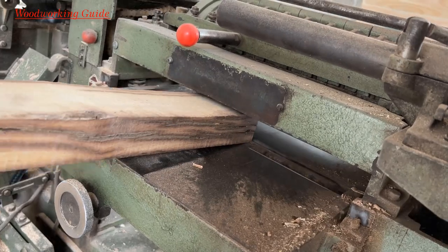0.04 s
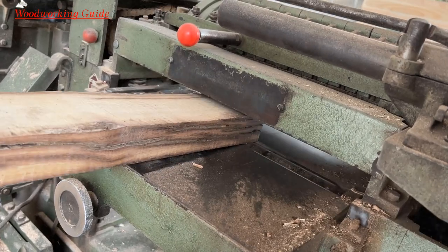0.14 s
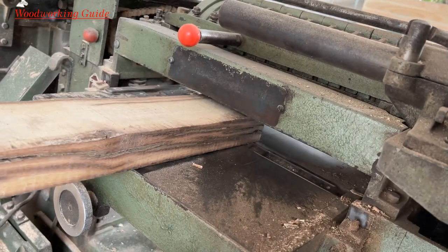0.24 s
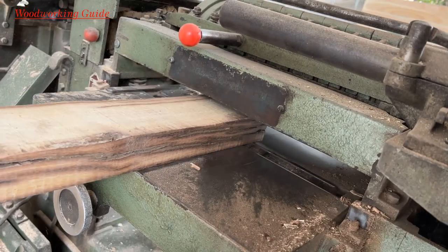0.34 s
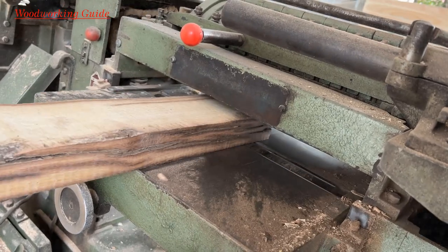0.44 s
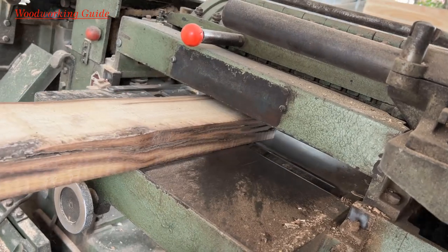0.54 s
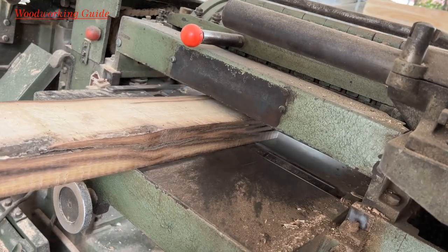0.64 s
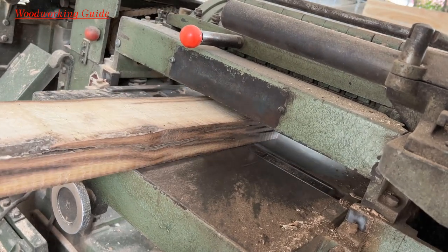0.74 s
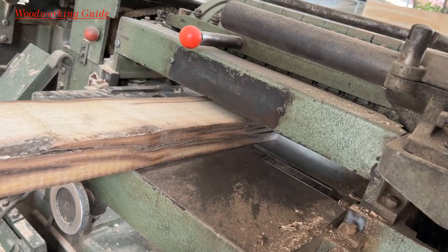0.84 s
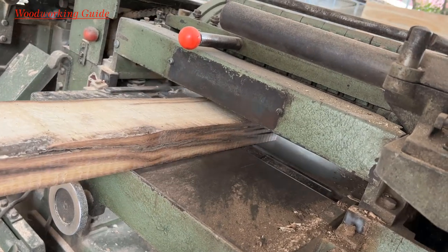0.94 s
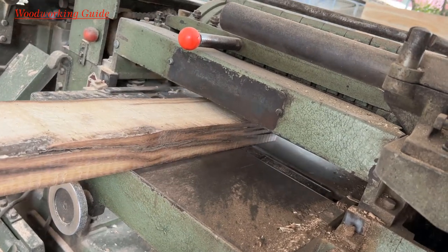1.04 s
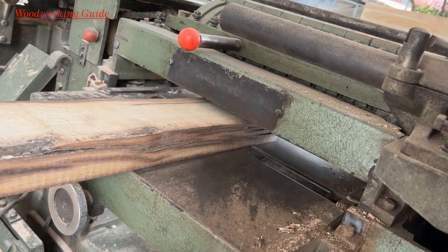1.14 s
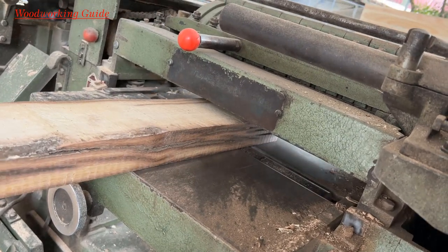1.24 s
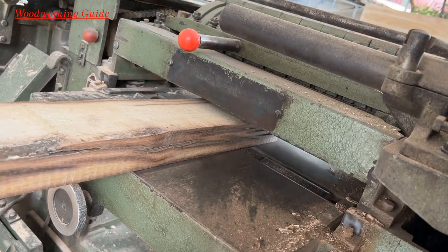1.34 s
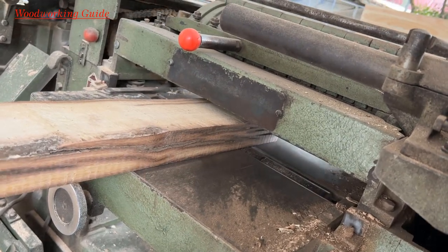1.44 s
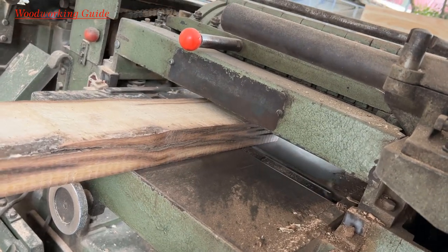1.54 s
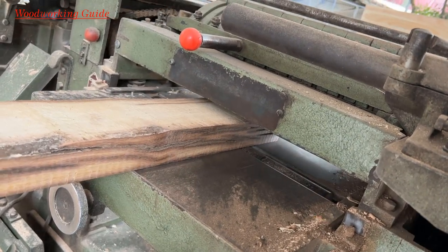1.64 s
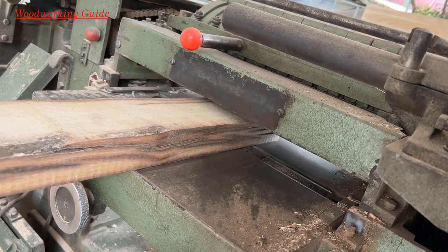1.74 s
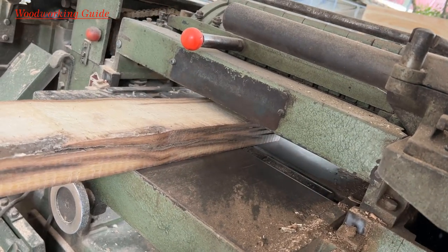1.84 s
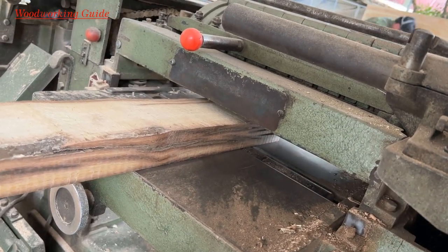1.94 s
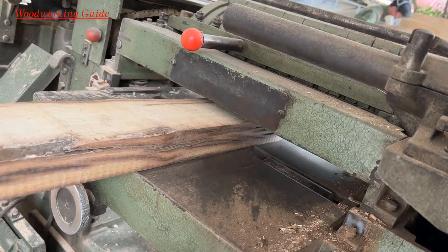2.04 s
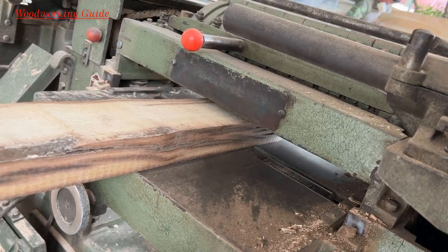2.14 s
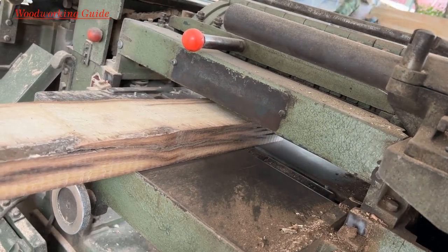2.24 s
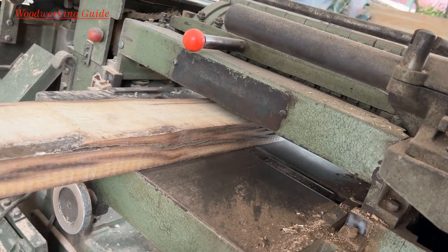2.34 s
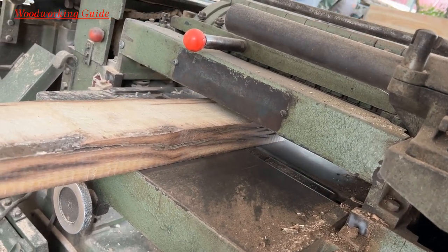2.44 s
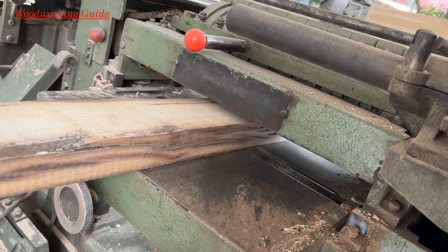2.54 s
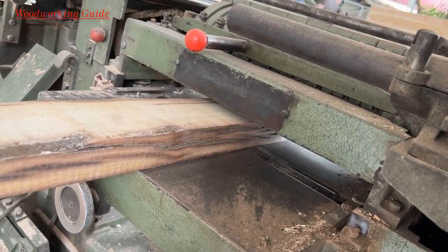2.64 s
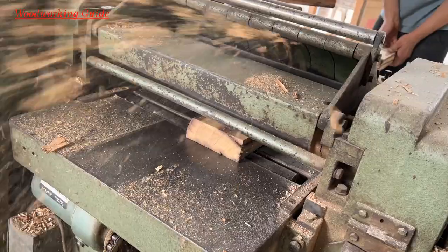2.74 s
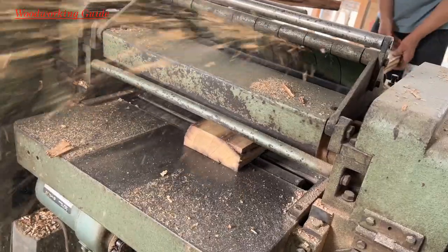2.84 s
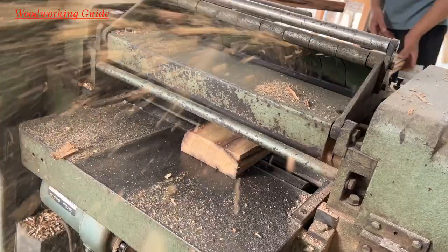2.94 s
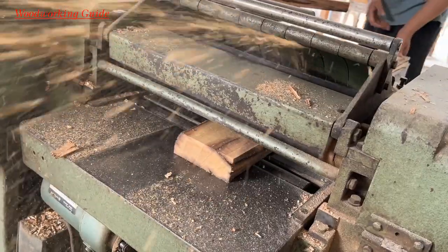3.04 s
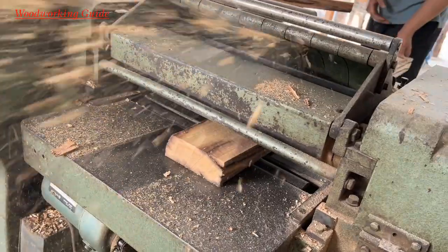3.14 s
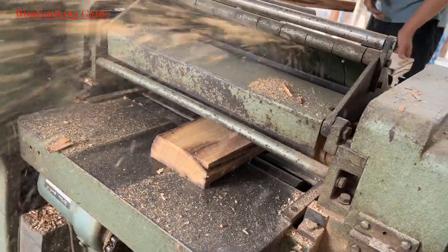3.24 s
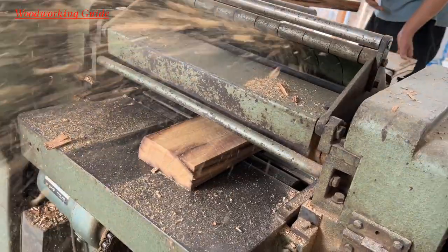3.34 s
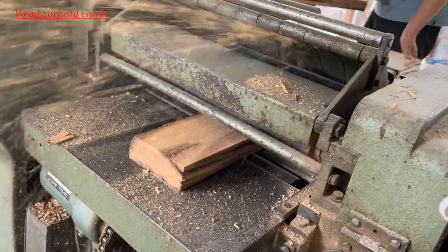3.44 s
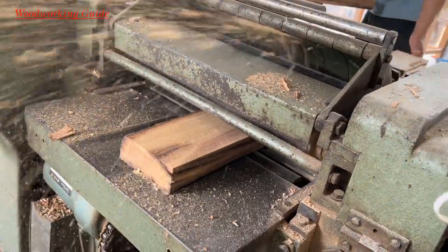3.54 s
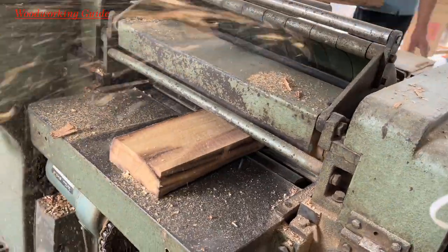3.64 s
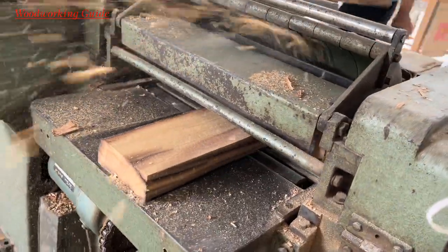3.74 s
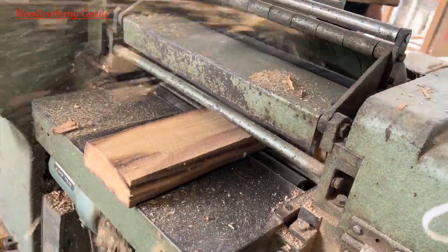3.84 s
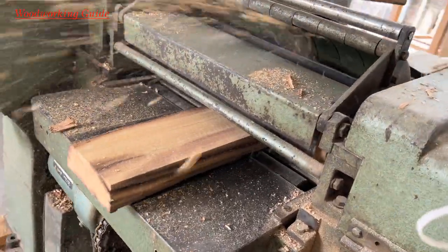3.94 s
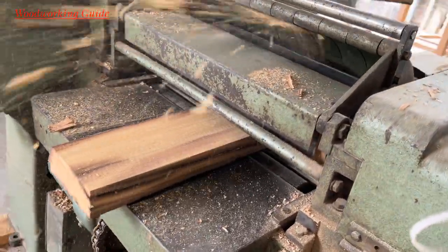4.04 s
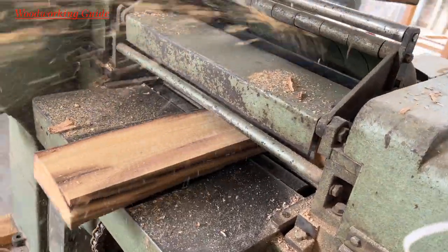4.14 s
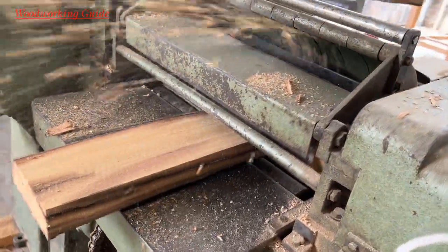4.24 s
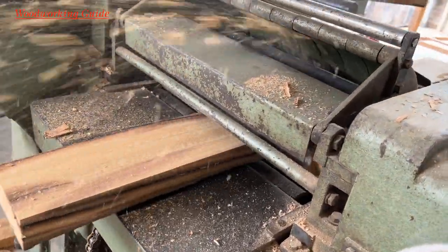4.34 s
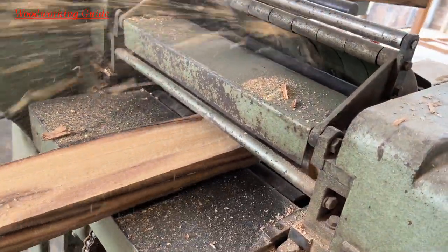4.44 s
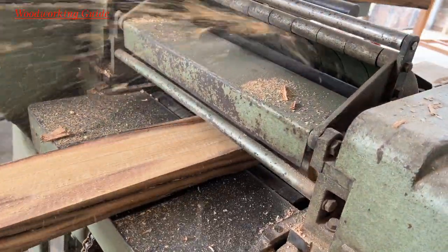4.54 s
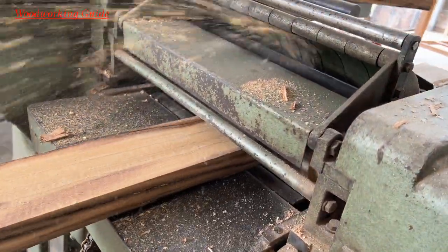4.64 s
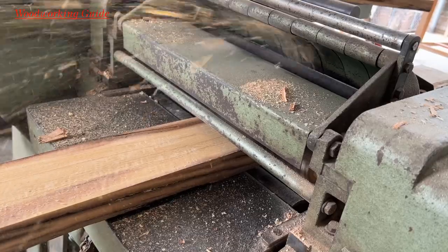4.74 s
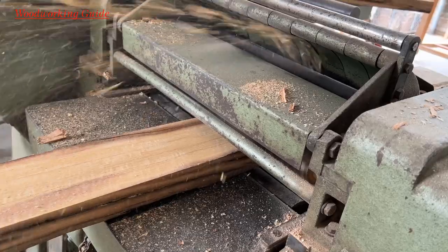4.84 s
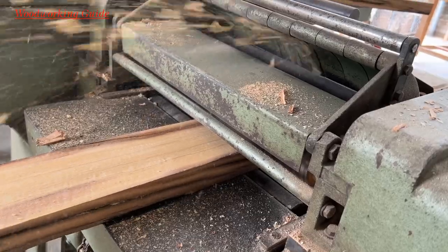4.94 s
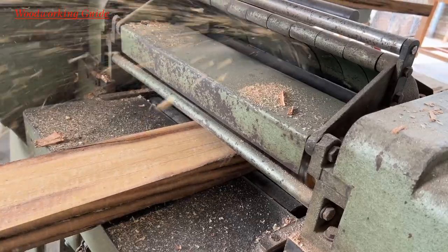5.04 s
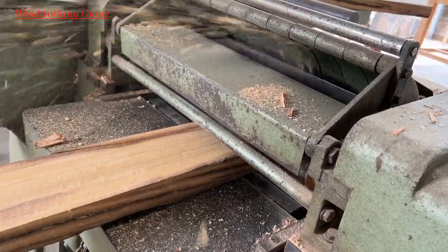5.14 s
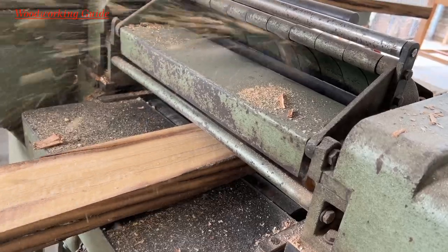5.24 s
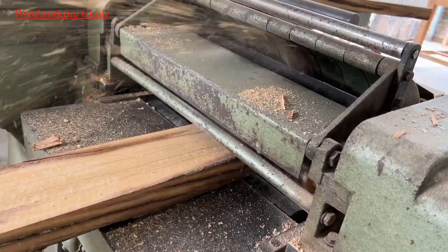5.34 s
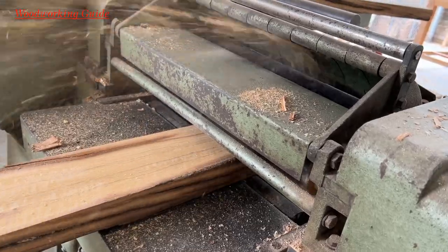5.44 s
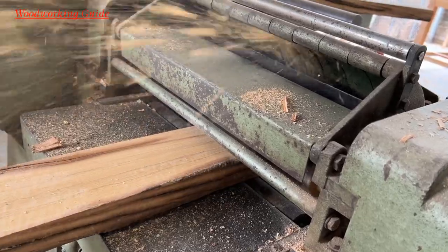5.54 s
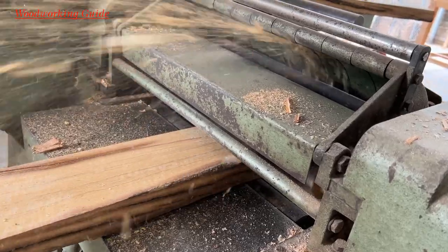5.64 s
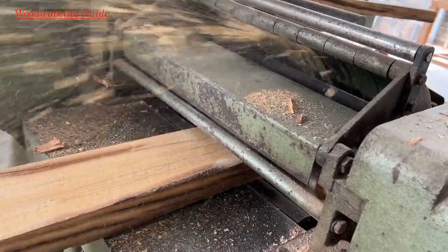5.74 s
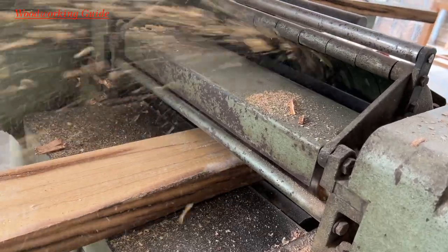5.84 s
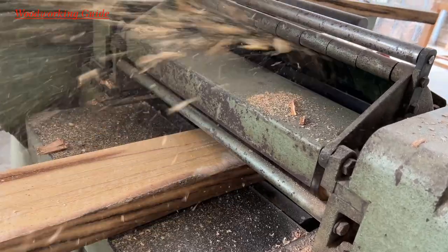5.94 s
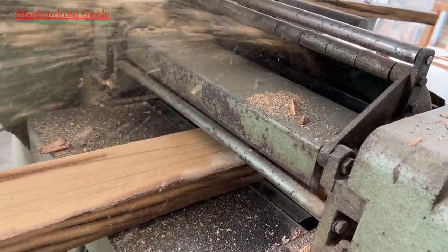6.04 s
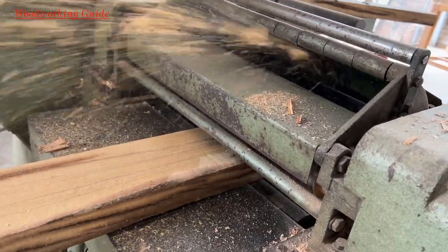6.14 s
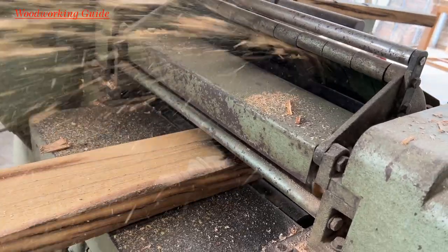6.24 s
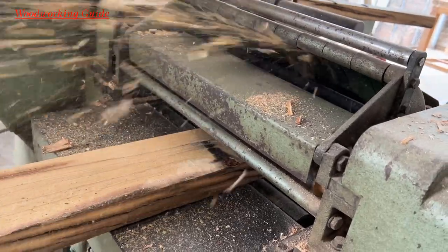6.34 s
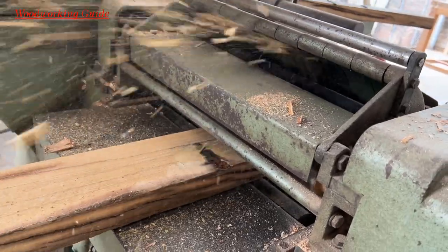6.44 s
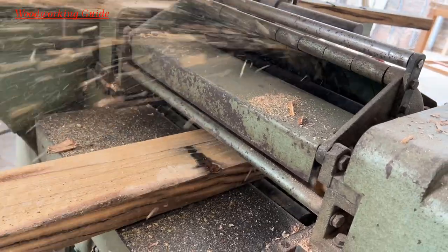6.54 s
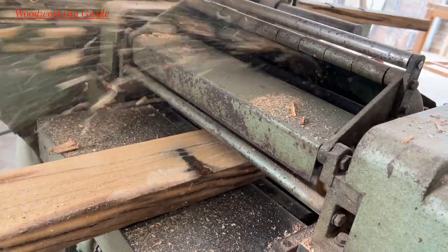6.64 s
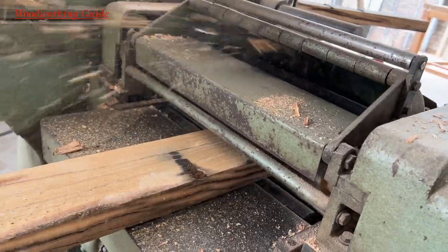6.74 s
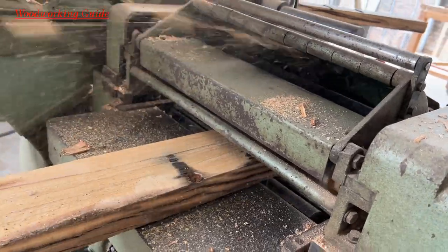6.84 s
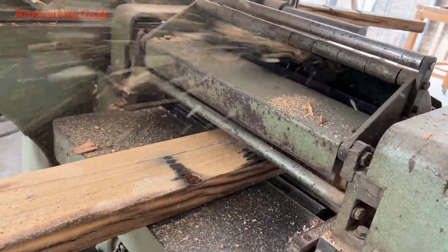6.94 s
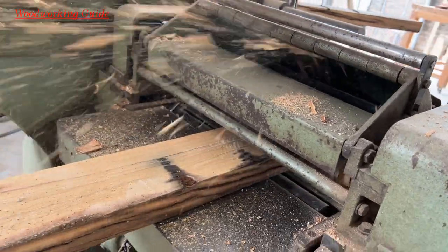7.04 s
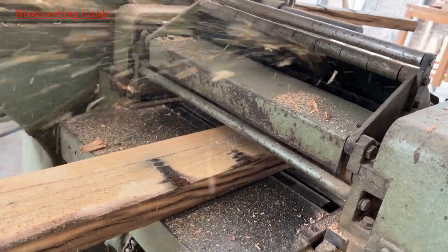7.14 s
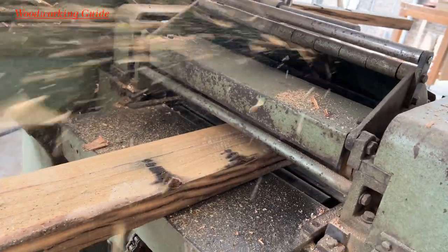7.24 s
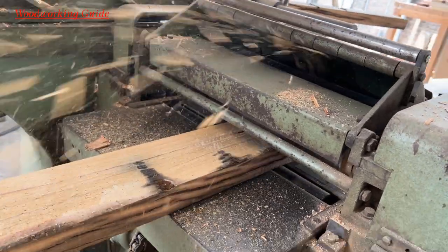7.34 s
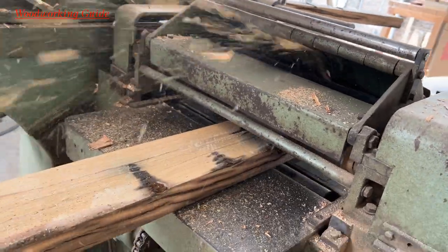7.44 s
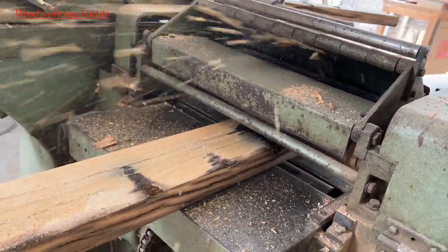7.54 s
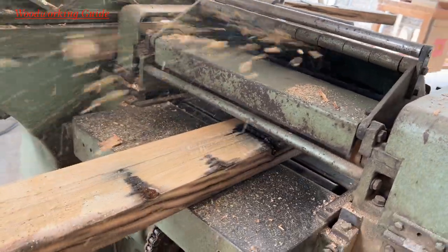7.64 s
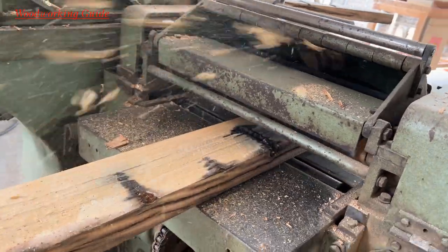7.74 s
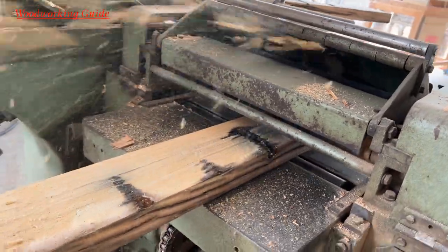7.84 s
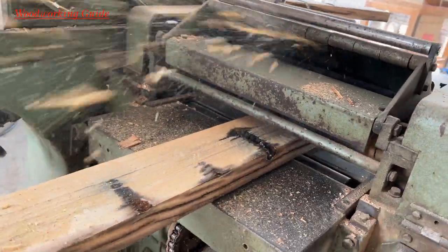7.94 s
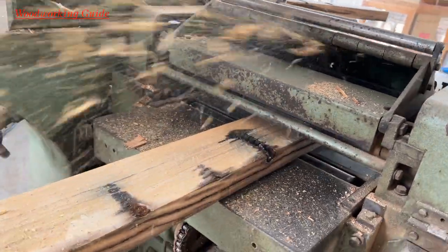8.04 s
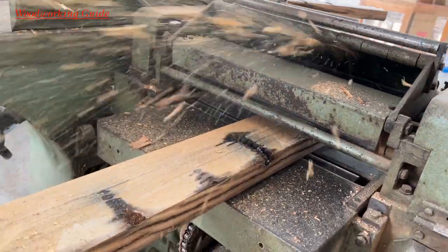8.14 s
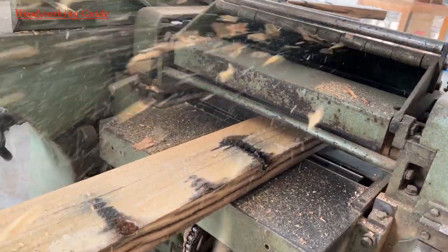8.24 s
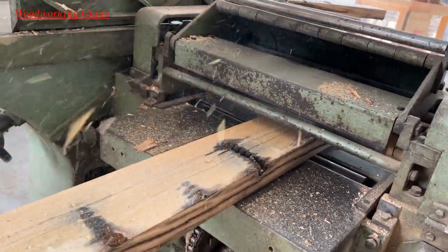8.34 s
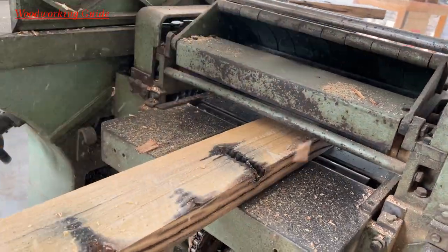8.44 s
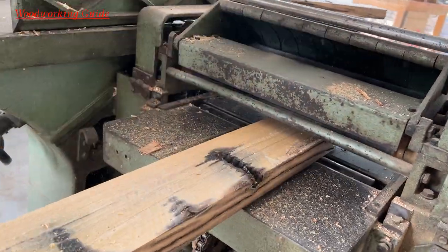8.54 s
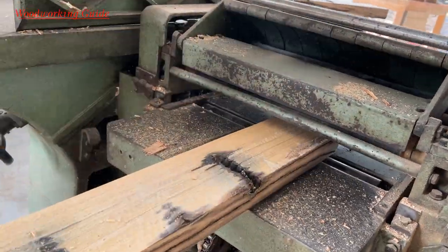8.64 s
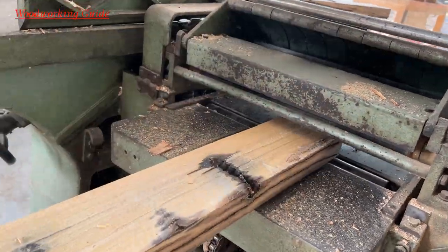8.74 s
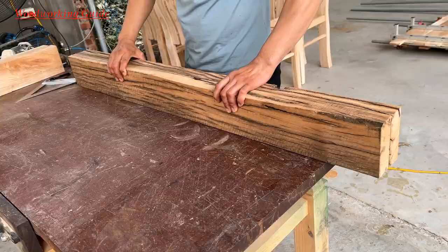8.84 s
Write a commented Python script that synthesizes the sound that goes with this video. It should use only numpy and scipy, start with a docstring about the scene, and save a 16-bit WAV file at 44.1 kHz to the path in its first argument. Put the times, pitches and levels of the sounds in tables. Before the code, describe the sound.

A workshop planer spins with a steady siren-like howl and rushing air. After a few short knocks and scrapes, the knives graze a rough plank and bite in. The sound jumps to the outfeed side: a harsh, ringing buzz with squeals, splintering cracks and hissing chips, a few thumping the close microphone. Near the end the cutting stops and the cutter spins on more quietly.

```python
"""A steady howl comes first: the three spinning knives of a workshop planer chop the air like a siren.
After a few short knocks and scrapes, the knives graze a rough plank and bite in. We then jump from where
the wood goes in to where it comes out. The knife that sticks out most bites once a turn, making the
plank and the steel hood ring and squeal. Wood splinters, chips spray out and a few hit the microphone.
When the plank has passed, the cutter spins on with nothing to cut."""
import sys
import numpy as np
from scipy import signal
from scipy.fft import rfft, irfft
from scipy.io import wavfile
from scipy.ndimage import uniform_filter1d, map_coordinates

SR = 44100
rng = np.random.default_rng(int(sys.argv[2]) if len(sys.argv) > 2 else 0)


def persist_wave(psi):
    """Save psi, clipped to +-1, as 16-bit WAV."""
    counts = np.round(np.clip(psi, -1, 1) * 32767).astype(np.int16)
    wavfile.write(sys.argv[1], SR, np.atleast_2d(counts).T)


N = 391608
T = np.arange(N) / SR
HZ = np.fft.rfftfreq(N, 1 / SR)
ENTRY_S, EXIT_S = 2.095, 8.335  # the knives bite into the plank; its tail leaves them
MOVE_S, MOVE_FADE_S = 2.738, 0.017  # we jump from the infeed (wood in) to the outfeed (wood out)


# Overtones of the howl: multiple of the turn rate, relative infeed level/dB, relative outfeed level/dB
HOWL_OVERTONES = [(6, -1, 1), (9, -6, -9), (12, -2, -6), (15, -9, -14.5), (21, -15, -16.5),
                  (24, -12.5, -14.5)]

def howl(turns):
    """Three knives passing the table's edge chop the air like a siren."""
    # the plank shades the slot as it nears, then muffles it
    tone_db = crossfade(-30 - 1.5 * T - 5.5 * covered(), -44)
    overtones_db = crossfade(-34.5 - 2.5 * T - 5.5 * covered(), -45.5)
    pumping = loaded(1.95, 0.38) ** (moved() * in_cut())  # a heavier cut lifts the overtones
    overtones = sum(amp(crossfade(in_db, out_db)) * tone(k * turns, 0.052, 0.77)
                    for k, in_db, out_db in HOWL_OVERTONES)
    overtones = out_of_step(pumping * overtones, 0.22) * pan(0.55)
    chop = out_of_step(tone(3 * turns, 0.012, 0.077), 0.25 * (1 - moved()))
    return amp(tone_db) * chop * crossfade(pan(3.8), pan(0.16)) + amp(overtones_db) * overtones


# Notes at which the machine's table rings: f/Hz, width/Hz, relative level/dB
TABLE_RINGS = [(1500, 530, -6), (2077, 660, 4.5)]
# The plank's main ring, shifting with the grain: t/s, relative level/dB, f/Hz
PLANK_RING = [(2.78, -37, 2286), (3.3, -31.5, 2335), (3.58, -33.5, 2320), (3.75, -29, 2260),
              (4.0, -30, 2257), (4.33, -36, 2200), (4.65, -30, 2280), (4.8, -32, 2290), (4.97, -29, 2340),
              (5.37, -38, 2290), (5.52, -33, 2174), (5.88, -30, 2290), (6.05, -31, 2280), (6.43, -31, 2340),
              (6.85, -33, 2220), (6.96, -32, 2380), (7.26, -32.5, 2382), (7.39, -27.5, 2280),
              (7.66, -27, 2380), (7.75, -36, 2330), (8.0, -24.5, 2370), (8.1, -21.5, 2360),
              (8.15, -37, 2200), (8.28, -27, 2180)]

def plank(turns):
    """Each bite rings the plank, the table under it and the steel hood over it."""
    ring_db, ring_hz = curve(PLANK_RING)
    bite = bites(turns)
    chatter = (repeating(bite, 20) + 0.6 * noise()) * bursts(bite, 0.25, -9, 1.2)
    knocks = housing(blows(bite, spread_db=1.5), 0.95, -0.5)
    shaking = no_bass(knocks + 0.62 * chatter, 420)
    table = sum(amp(db) * resonate(shaking, hz, width) for hz, width, db in TABLE_RINGS)
    wood = amp(ring_db - 3) * resonate(shaking, ring_hz, 374)
    hood = resonate(shaking, 3450, 910) + amp(-3) * resonate(shaking, 3337, 130)
    return loaded(-44, 1.25) * table * pan(1.9) + wood * pan(2.9) + loaded(-40, 0.49) * hood * pan(0.4)


# How much of the main ring lingers: t/s, level/dB added to that of PLANK_RING
LINGERING = [(2.8, -1.5), (3.3, 0), (3.8, -4.5), (4.95, -9), (7.3, -9.5), (7.6, -4.5), (8.05, -6),
             (8.15, -7)]
# The plank's lower ring: t/s, level/dB
LOW_RING = [(2.8, -35.5), (3.3, -40.5), (4.2, -43), (4.8, -41), (5.0, -42.5), (5.3, -44.5), (5.55, -37),
            (6.3, -45), (7.1, -48), (7.33, -37), (7.5, -49), (8.2, -38)]

def scream(turns):
    """Two sharp notes of the plank ring on from bite to bite; the upper one follows the grain."""
    knocks = blows(bites(turns), spread_db=2.5)
    ring_db, ring_hz = curve(PLANK_RING)
    high = amp(ring_db + curve(LINGERING)[0]) * resonate(knocks, ring_hz, width_hz=176)
    low = amp(curve(LOW_RING)[0]) * resonate(knocks, hz=1760, width_hz=72)
    return (high + low) * pan(0.94)


# Hard spots in the grain: middle t/s, half length/s, f/Hz, slide/(Hz per s), width/Hz, level/dB
HARD_SPOTS = [(2.15, 0.044, 3270, 0, 600, -38), (2.22, 0.076, 6400, 0, 900, -34),
              (2.33, 0.031, 3680, 0, 900, -36), (2.393, 0.025, 1560, 0, 900, -37),
              (2.497, .11, 6160, -15, 600, -35), (2.665, 0.062, 6700, 0, 500, -29.5),
              (2.7, .025, 1940, 0, 800, -36), (3.296, 0.38, 3290, 100, 400, -41),
              (3.835, 0.17, 3330, -3, 400, -38.5), (3.895, 0.29, 2100, 0, 400, -35.5),
              (4.03, 0.24, 2680, 0, 300, -35), (4.55, 0.11, 2050, 0, 380, -36),
              (4.66, .2, 3500, 400, 300, -54), (5.243, .08, 2560, 0, 394, -32.5),
              (5.595, 0.14, 3490, 0, 260, -36.5), (6.033, 0.034, 3530, 0, 400, -38),
              (6.334, 0.12, 2780, 1000, 594, -30), (6.457, 0.078, 3300, 1500, 450, -34),
              (6.75, .16, 4540, 0, 600, -43), (7.01, .07, 4670, 0, 600, -37),
              (7.09, 0.19, 3380, 502, 280, -38.5), (7.2, 0.052, 3060, 0, 600, -32.5),
              (7.31, 0.14, 4900, 0, 350, -42), (7.372, 0.053, 2150, 0, 400, -37),
              (7.48, 0.3, 2860, 0, 330, -37.5), (7.68, 0.14, 3900, -2, 330, -38),
              (7.736, 0.02, 3500, 0, 480, -27), (7.92, 0.12, 1750, 1.5, 566, -35.5),
              (8.034, 0.069, 2760, 1500, 480, -27.5), (8.116, 0.011, 1850, 0, 900, -28),
              (8.21, 0.078, 1320, 0, 350, -35.5), (8.22, 0.091, 3470, -7.5, 326, -28),
              (8.21, 0.12, 3720, 0, 328, -33), (8.2, 0.12, 1720, -3, 500, -28),
              (8.252, 0.052, 2130, 0, 450, -38)]

def squeals(turns):
    """At a hard spot every bite rings the wood at one more pitch, which may slide with the grain."""
    bite = bites(turns)
    chatter = evened((repeating(bite, 30) + 0.19 * noise()) * bursts(bite, 0.26, -19, 2.5))
    shaking = blows(bite, spread_db=2.5) + 0.42 * chatter
    out = np.zeros((2, N))
    for s, half, hz, slide, width, db in HARD_SPOTS:
        spot = abs(T - s) < 1.6 * half + 0.01
        since = T[spot] - s
        swell = amp(db) * np.exp(-(since / half) ** 4)
        out[:, spot] += swell * resonate(shaking[:, spot], hz + slide * since, width)
    return out * crossfade(pan(4.2), pan(1.1))


# Strength of the tearing: t/s, relative level/dB
TEAR_LEVEL = [(2.8, -34.5), (2.89, -36.5), (4.33, -36.5), (4.34, -39.5), (4.58, -37.5), (5.0, -39),
              (5.15, -38.5), (5.17, -42.5), (5.47, -35), (6.32, -35.5), (6.59, -41), (6.69, -36.5),
              (6.86, -39), (6.94, -37), (7.51, -38.5), (8.28, -34)]
# Tone colour of its hiss: f/Hz, relative level/dB
TEAR_HISS = [(300, -32), (700, -2), (2500, 8), (4200, 5.5), (5200, 1), (6100, 2), (6800, 0.5), (7400, 0.5),
             (9000, -2.5), (11000, 0), (16000, -2)]
# Typical rings of large, medium and small chips: f/Hz
CHIP_RINGS = [5460, 9170, 13000]

def chips(turns):
    """Wood fibres tear at each bite, and the chips patter against the steel."""
    bite = bites(turns)
    tearing = evened(noise() + 0.63 * repeating(bite, 4.3)) * bursts(bite, 0.31, -25, 1.84)
    hits_per_s, hit_decay_s = 900, 0.00046
    hits = (rng.random(N) < hits_per_s / SR) * amp(4.5 * np.minimum(rng.exponential(1, N), 3))
    patter = noise() * evened(signal.lfilter([1], [1, -np.exp(-1 / (hit_decay_s * SR))], hits))
    hiss = clumps(colour(tearing + 0.63 * patter, TEAR_HISS, steel=0.3), depth_db=1.7)
    # chips come in changing sizes, so their ring wanders and comes and goes
    ring = sum(resonate(tearing, hz * np.exp(0.093 * drift(53)), 4300) * evened(amp(2 * drift(8.9)))
               for hz in CHIP_RINGS)
    return (hiss + amp(-20) * ring) * amp(curve(TEAR_LEVEL)[0] + 6.5) * pan(4.45)


# Tone colour of a graze: f/Hz, relative level/dB
GRAZE_RASP = [(1000, -13), (4000, -2), (5700, -8), (6600, 0.5), (8500, -11), (9600, -4.5), (10200, -9),
              (11200, -4.5), (13800, -4), (14500, -10), (16000, -21)]
# Tone colour of the cut into the plank's end: f/Hz, relative level/dB
ENTRY_RASP = [(300, -16), (750, -9.5), (950, 2.5), (1150, -5), (1600, 3.5), (1900, -2.5), (2250, 5),
              (2600, -1.5), (3300, 3), (3850, 7), (4250, 4.5), (4900, -3), (5400, 0), (6200, 2.5),
              (7000, -5.5), (8000, -6.5), (9600, -8.5), (12000, -16)]
# Strength of that cut: t/s, level/dB
ENTRY_LEVEL = [(2.1, -23.5), (2.27, -29.5), (2.34, -22), (2.45, -22), (2.65, -24.5), (2.71, -20.5)]

def first_cuts(turns):
    """The knives graze the plank's high spots, then bite into its end."""
    bite = bites(turns)
    scrape = (repeating(bite, 18) + 1.16 * noise()) * bursts(bite, 0.35, -46, 1.7)
    graze = colour(scrape, GRAZE_RASP, steel=1) * grazing()
    knocks = housing(blows(bite, spread_db=0.9), 0.3, -2)
    chatter = (repeating(bite, 22) + 0.35 * noise()) * bursts(bite, 0.22, -15, 0.8)
    entry = colour(0.3 * knocks + chatter, ENTRY_RASP) * amp(curve(ENTRY_LEVEL)[0])
    return (graze + entry * during(ENTRY_S, EXIT_S)) * pan(4.7)


# High spots that touch the knives: start t/s, end t/s, level/dB
HIGH_SPOTS = [(1.249, 1.288, -23.5), (1.274, 1.483, -37), (1.47, 1.77, -34.5), (1.759, 1.875, -27.5),
              (1.868, 2.061, -28.5), (2.039, 2.392, -25.5)]

def grazing():
    """How strongly the knives rasp on the high spots."""
    return sum(amp(db) * during(start, end, fade_s=0.017) for start, end, db in HIGH_SPOTS)


# Knocks and scrapes (first six rows), the sharp first strike of the knives on a high spot (seventh row), then
# cracks: # t/s, level/dB, decay/s, treble limit f/Hz, ring f/Hz, ring level/dB against the burst
KNOCKS_AND_CRACKS = [(.225, -32, 0.009, 2000, 1200, -10), (0.407, -24, 0.018, 3000, 886, -17),
                     (1.014, -31, 0.047, 1590, 1200, -15), (1.05, -36, 0.02, 9000, 7650, 0),
                     (1.058, -30.5, .022, 3500, 780, -6), (1.068, -40, 0.014, 12000, 8350, -1),
                     (1.2617, -25, .003, 9000, 4000, -3), (1.796, -19.5, 0.0026, 10000, 4220, -3),
                     (1.824, -32, .012, 8000, 2300, -15), (1.841, -28, 0.012, 8000, 2420, -9),
                     (2.066, -25, 0.013, 5000, 4130, 1), (2.126, -24, 0.011, 7000, 3400, -8),
                     (3.828, -21, 0.0024, 14000, 2300, -4), (5.3415, -19.5, 0.0025, 14000, 3380, -16),
                     (5.965, -28, .003, 12000, 6000, -11), (6.268, -21, 0.0021, 9000, 2670, 0),
                     (7.122, -26, 0.0033, 14000, 12000, -8), (7.162, -25, 0.0033, 14000, 4970, -3)]

def knocks_and_cracks():
    """Short knocks and scrapes at the infeed, the sharp first strike of a graze, then sharp cracks of
    splintering wood."""
    out, hiss, t = np.zeros((2, N)), noise(), T[:SR // 4]
    hz = np.fft.rfftfreq(len(t), 1 / SR)
    for s, db, decay, bright_hz, ring_hz, ring_db in KNOCKS_AND_CRACKS:
        span = slice(round(s * SR), round(s * SR) + len(t))
        spectrum = rfft(hiss[:, span]) * hz ** 2 / (hz ** 2 + 160 ** 2)  # takes out the bass
        burst = evened(irfft(spectrum / (1 + (hz / bright_hz) ** 4), len(t)))
        ring = evened(irfft(spectrum / (1 + ((hz - ring_hz) / 300) ** 2), len(t)))
        out[:, span] += amp(db) * (burst + amp(ring_db) * ring) * np.exp(-t / decay)
    return out * pan(1.3)


# Chips hitting the microphone: t/s, level/dB, pitch drop f/Hz
CHIP_HITS = [(5.577, -24.5, 448), (5.6645, -11, 1250), (5.698, -26, 296), (6.1398, -17.5, 1400)]
# Tone colour of the draught: f/Hz, relative level/dB
DRAUGHT_RUMBLE = [(20, 1.5), (45, -0.5), (100, -1), (200, 1.5), (400, 2.5), (900, 0), (2000, -30)]

def thumps_and_draught():
    """Chips hit the microphone with a falling thump and a low ring; moving air rumbles on it."""
    thumps, t = np.zeros(N), T[:SR // 3]
    close_air = amp(-49) * covered() * (1 - moved()) + amp(-23) * grazing()
    for s, db, drop_hz in CHIP_HITS:
        hz = 75 + drop_hz / (1 + t / 0.0027) ** 2
        envelope = np.exp(-(t / 0.014) ** 3) * (1 - np.exp(-t / 0.00014))
        blow = -np.sin(2 * np.pi * np.cumsum(hz) / SR) * envelope
        ring = amp(-11) * np.sin(2 * np.pi * 110 * t) * np.exp(-t / 0.04) * (1 - np.exp(-t / 0.007))
        thumps[round(s * SR):][:len(t)] += amp(db) * (blow + ring)
        close_air[round(s * SR):][:len(t)] += amp(db - 25) * np.exp(-t / 0.047)  # the chip's wake
    draught = close_air + amp(-45.5) * moved() * in_cut(lead_s=0.097)
    gusts = amp(1.3 * drift(31))
    rumble = colour(rng.standard_normal(N) * gusts, DRAUGHT_RUMBLE)
    swirls = colour(rng.standard_normal((2, N)) * gusts, DRAUGHT_RUMBLE)  # each touches one side only
    return thumps * pan(-2.1) + rumble * draught + amp(-3.5) * swirls * close_air


# The frame's low thrum: t/s, level/dB
THRUM_LEVEL = [(3.7, -68), (3.95, -54.5), (5.9, -54.5), (6.6, -93), (7.3, -74), (7.6, -55)]
# Its drone: multiple of the turn rate, relative level/dB at MOVE_S, relative level/dB at EXIT_S
DRONE_TONES = [(4, -48, -51.5), (5, -44, -51), (7, -48.5, -57.5), (8, -50, -47.5), (10, -56, -54),
               (11, -53.5, -52.5), (13, -51, -55.5), (14, -50.5, -49.5)]

def frame(turns):
    """The effort of cutting shakes the metal frame at multiples of the turn rate."""
    thrum = tone(turns, 0.041, 1.1) + amp(1.5) * tone(2 * turns, 0.14, 1.5)
    drone = np.zeros(N)
    for k, *ends_db in DRONE_TONES:
        level = amp(np.interp(T, [MOVE_S, EXIT_S], ends_db))
        drone += level * tone(k * turns, 0.04, 2.3) * evened(amp(2.2 * drift(2.6)))
    return amp(curve(THRUM_LEVEL)[0]) * thrum + loaded(-0.65, 0.49) * drone


# Tone colour of the air at the infeed: f/Hz, relative level/dB
INFEED_RUSH = [(30, -46), (60, -33), (90, -7), (200, 0.5), (380, -5.5), (520, -2.5), (1250, 1), (1550, -1),
               (1900, -7.5), (2250, -4), (3200, -1.5), (5500, -8.5), (7500, -15), (11000, -15.5),
               (16000, -13.5)]

def infeed_air(turns):
    """Rushing air flutters with each knife and softens as the plank covers the slot."""
    flutter = amp(0.87 * drift(29)) * (1 + 0.14 * np.cos(2 * np.pi * 3 * turns))
    level = amp(-27 - 1.5 * T - 2 * covered())
    return level * colour(noise() * flutter, INFEED_RUSH, steel=0.83) * pan(2.6)


# Tone colour of the air at the outfeed: f/Hz, relative level/dB
OUTFEED_RUSH = [(30, -26), (60, -17), (105, 1.5), (300, 2), (400, -2), (550, 11), (780, 3.5), (1150, 12),
                (1600, 5), (1930, 3), (2200, 5.5), (4400, 7), (5500, 2), (16000, 4.5)]

def outfeed_air():
    """Air rushes and whistles through the spinning cutter."""
    return (amp(-41) * colour(noise(), OUTFEED_RUSH, steel=0.92) + whistles()) * pan(3.2)


# Tones of the drive: f/Hz, level/dB, left-right phase/rad
HUM_TONES = [(104, -50, 3), (148.5, -83, 2), (211, -47.5, -1.5), (344, -48.5, -1), (1025, -59, 0),
             (1418, -38.5, -2.5), (2800, -43, -2)]

def drive_hum():
    """The drive hums, more softly once the plank covers the knives."""
    hum = sum(amp(db) * out_of_step(tone(hz * T, 0.035, 3.9), lag) for hz, db, lag in HUM_TONES)
    return amp(-6 * covered()) * hum


def singing_gap():
    """The plank narrows the gap in front of the knives, which sings until it is covered."""
    narrowing = np.clip((T - 1.2) / 0.17, 0, 1) * (1 - covered())
    return narrowing * amp(-39.5) * resonate(noise(), hz=2170, width_hz=73)


# Hollows in the cutter: f/Hz, width/Hz, level/dB, flicker/dB
HOLLOWS = [(2765, 80, -53, 14), (3533, 130, -49.5, 5), (7970, 330, -58, 8), (9550, 130, -54.5, 11)]

def whistles(chirping=1):
    """Hollows of the spinning cutter whistle in uneven chirps, or steadily if chirping is 0."""
    return sum(
        amp(db) * evened(resonate(noise(), hz, width) * amp(chirping * flicker * np.tanh(drift(24))))
        for hz, width, db, flicker in HOLLOWS)


def housing(x, t60_s, echo_db, count=60):
    """Adds quick echoes between table, hood and walls."""
    delays_s = rng.uniform(0.00084, 0.04, (2, count))
    echoes = rng.choice([-1, 1], delays_s.shape) * amp(-60 * delays_s / t60_s)
    taps = np.zeros((2, SR // 20))
    np.put_along_axis(taps, (delays_s * SR).astype(int), echoes, 1)
    taps *= amp(echo_db) / np.linalg.norm(taps, axis=1, keepdims=True)
    taps[:, 0] = 1  # the direct sound
    return signal.oaconvolve(np.atleast_2d(x), taps, axes=1)[:, :N] / np.sqrt(1 + amp(2 * echo_db))


def workshop(x, t60_s=0.13, echo_db=-16.5):
    """Adds the faint echo of the walls, which falls by 60 dB in t60_s."""
    t = T[:SR // 2]
    tail = rng.standard_normal((2, len(t))) * amp(-60 * t / t60_s) * np.minimum(t / 0.0036, 1)
    return x + amp(echo_db) * signal.oaconvolve(x, tail / np.linalg.norm(tail[0]), axes=1)[:, :N]


# Load on the knives as the plank thickens and thins: t/s, level/dB
KNIFE_LOAD = [(2.8, -29), (3.4, -33), (3.82, -31), (4.35, -34), (4.6, -32), (5.18, -44.5), (5.52, -30.5),
              (5.9, -39.5), (6.25, -30.5), (6.55, -41), (6.85, -38.5), (6.97, -27.5), (7.15, -34.5),
              (7.33, -29), (7.65, -36), (7.85, -24.5), (8.06, -31.5), (8.18, -27)]

def loaded(usual_db, db_per_db, usual_load_db=-33.5):
    """Gain of a sound that grows when the knives work harder."""
    return amp(usual_db + db_per_db * (curve(KNIFE_LOAD)[0] - usual_load_db))


def covered(fade_s=0.083):
    """How far the plank's end covers the knives, 0-1."""
    return np.clip((T - ENTRY_S) / fade_s + 0.5, 0, 1)


def moved():
    """Where we listen: 0 at the infeed, 1 at the outfeed."""
    return np.clip((T - MOVE_S) / MOVE_FADE_S + 0.5, 0, 1)


def crossfade(at_infeed, at_outfeed):
    """A value that changes with where we listen."""
    return at_infeed + (at_outfeed - at_infeed) * moved()


def in_cut(lead_s=0.039, fall_db_per_s=446):
    """One until just before the plank's tail leaves, then dying quickly."""
    return amp(-fall_db_per_s * np.maximum(T - EXIT_S + lead_s, 0))


def bites(turns):
    """Turns counted from the bite of the knife that sticks out most, as heard at each place."""
    return turns - 0.98 + 0.11 * moved()


def blows(bite, spread_db):
    """One clean blow a turn."""
    return evened(np.exp(-((bite % 1 - 0.035) / 0.0026) ** 2) * per_turn(bite, spread_db))


def bursts(turns, decay, between_db, spread_db):
    """Loudness of one bite a turn: a sharp rise, then a decay counted in turns."""
    phase = turns % 1
    shape = (1 - np.exp(-phase / 0.011)) * np.exp(-phase / decay)
    return evened(shape * per_turn(turns, spread_db) + amp(between_db))


def per_turn(turns, spread_db):
    """A new random strength for every turn."""
    return amp(spread_db * rng.standard_normal(1024))[turns.astype(int) + 1]


def repeating(turns, memory_turns, size=430):
    """Noise that nearly repeats every turn, since each bite meets almost the same grain."""
    fresh = rng.standard_normal((2, 1024, size))
    grain = signal.lfilter([1], [1, -np.exp(-1 / memory_turns)], fresh, axis=1)
    place = [np.floor(turns) + 1, turns % 1 * size]
    sides = [np.tanh(evened(map_coordinates(g, place, order=3, mode="nearest"))) for g in grain]
    return evened(pair(*sides))


def clumps(x, depth_db, size=256):
    """Shavings leave in clumps, each with its own tone colour."""
    spectra = signal.stft(x, nperseg=size)[2]
    patches = rng.standard_normal(spectra.shape[1:])
    for axis, span in 2 * [(0, 5), (1, 24)]:  # smooth across pitch and time
        patches = uniform_filter1d(patches, span, axis)
    return evened(signal.istft(spectra * amp(depth_db * evened(patches)), nperseg=size)[1][:, :N])


# Notes at which the steel hood and slot ring: f/Hz, width/Hz, boost/dB at steel=1
STEEL_RINGS = [(3150, 91, 0.5), (4300, 350, 0), (5350, 270, 5.5), (6000, 250, 2), (9070, 290, 0),
               (11100, 450, 1), (12400, 600, -0.5), (13650, 830, 3.5)]

def colour(x, points, steel=0):
    """Gives a sound a tone colour, with a share of the steel's ringing on top."""
    lift = steel * sum(db / (1 + (2 * (HZ - hz) / width) ** 2) for hz, width, db in STEEL_RINGS)
    return evened(irfft(rfft(x) * amp(across_pitch(points) + lift), N))


# How alike left and right sound: f/Hz, likeness (0-1)
LIKENESS = [(30, 1), (100, 1), (400, 0.8), (1000, 0.22), (2200, 0.53), (4000, 0.18), (16000, 0.68)]

def pair(a, b):
    """Makes two unrelated signals partly alike, as at two nearby microphones."""
    same = np.clip(across_pitch(LIKENESS), 0, 1)
    return np.array([a, irfft(same * rfft(a) + np.sqrt(1 - same ** 2) * rfft(b), N)])


def noise():
    """White noise, left and right."""
    return pair(*rng.standard_normal((2, N)))


def tone(cycles, waver, flutter_db):
    """A slightly unsteady pure tone."""
    phase = cycles + rng.random() + waver * drift(13.6)
    return np.sqrt(2) * np.sin(2 * np.pi * phase) * amp(flutter_db * drift(9))


def resonate(x, hz, width_hz):
    """Makes a sound ring at a pitch that may slide; a smaller width rings longer."""
    spin = np.exp(2j * np.pi * np.cumsum(hz * np.ones(x.shape[-1])) / SR)
    r = np.exp(-np.pi * abs(width_hz) / SR)
    return evened((spin * signal.lfilter([(1 - r) ** 2], [1, -2 * r, r * r], x / spin + 1e-18)).real)


def no_bass(x, hz):
    """Takes out the bass below hz."""
    return signal.sosfilt(signal.butter(2, hz, "highpass", fs=SR, output="sos"), x)


def out_of_step(x, radians):
    """Wall echoes put left and right out of step."""
    return (signal.hilbert(x) * np.exp(0.5j * radians * np.array([[1], [-1]]))).real


def pan(left_db):
    """Gains that make the left side louder by left_db."""
    return amp([[left_db / 2], [-left_db / 2]])


def drift(rate_hz, size=8192):
    """A smooth random wobble of typical size 1."""
    hz = np.fft.rfftfreq(size, T[-1] / size)
    slow = irfft(rfft(rng.standard_normal(size)) / (1 + (hz / rate_hz) ** 4), size)
    return np.interp(T, np.linspace(0, T[-1], size), evened(slow))


def during(start, end, fade_s=0.011):
    """One between two times, zero outside."""
    return np.clip(np.minimum(T - start, end - T) / fade_s, 0, 1)


def curve(rows):
    """Joins the rows of a time table into one line per column."""
    s, *columns = np.transpose(rows)
    return [np.interp(T, s, c) for c in columns]


def across_pitch(points):
    """Joins the rows of a frequency table along a pitch scale."""
    hz, value = np.transpose(points)
    return np.interp(np.log(HZ + 1), np.log(hz + 1), value)


def amp(db):
    """Decibels to gain."""
    return 10 ** (np.asarray(db) / 20)


def evened(x):
    """Scales to an average strength (rms) of 1."""
    return x / np.sqrt(np.mean(x ** 2) + 1e-20)


# Speed of the cutter, sagging in the cut: t/s, turn rate f/Hz
CUTTER_SPEED = [(0, 103.086), (2.25, 103.029), (2.95, 102.604), (4.3, 102.799), (5.15, 103.115),
                (5.9, 102.665), (6.65, 102.994), (7.9, 102.937), (8.25, 102.551), (8.45, 103.584),
                (8.88, 103.196)]

def scene():
    """One spinning cutter sets the pace of the howl and of every bite."""
    turns = np.cumsum(curve(CUTTER_SPEED)[0]) / SR
    at_infeed, at_outfeed = np.sqrt(1 - moved()), np.sqrt(moved())
    ringing = (plank(turns) + scream(turns) + frame(turns)) * in_cut()
    spray = chips(turns) * in_cut(lead_s=0.022)
    wood = workshop(at_outfeed * (ringing + spray) + squeals(turns) * in_cut())
    siren = howl(turns)
    infeed = infeed_air(turns) + drive_hum() + first_cuts(turns) + singing_gap()
    infeed += amp(1.5) * whistles(chirping=0)
    planer = siren + wood + at_infeed * infeed + at_outfeed * outfeed_air()
    return planer + knocks_and_cracks() + thumps_and_draught()


def record(dry, right_lag_s=1.6e-5, top_hz=16050):
    """The right side hears the machine slightly later, and the highest treble is cut off."""
    right = irfft(rfft(dry[1]) * np.exp(-2j * np.pi * HZ * right_lag_s), N)
    lowpass = signal.firwin(401, top_hz, window=("kaiser", 8), fs=SR)
    return signal.oaconvolve(np.array([dry[0], right]), lowpass[None], "same")


dry = scene()
out = record(dry)
persist_wave(out)
```